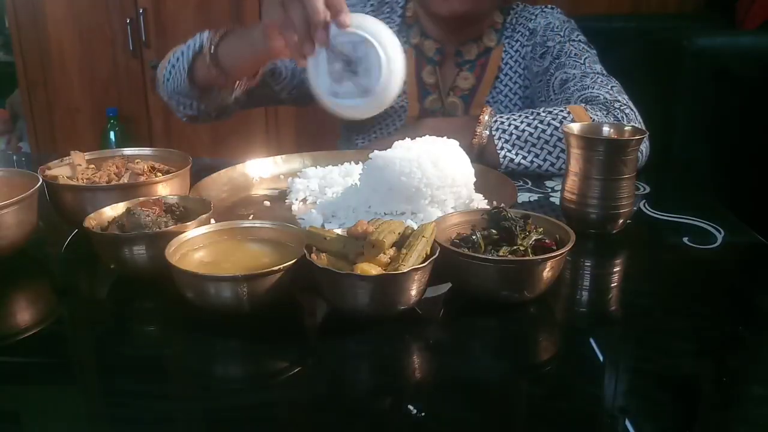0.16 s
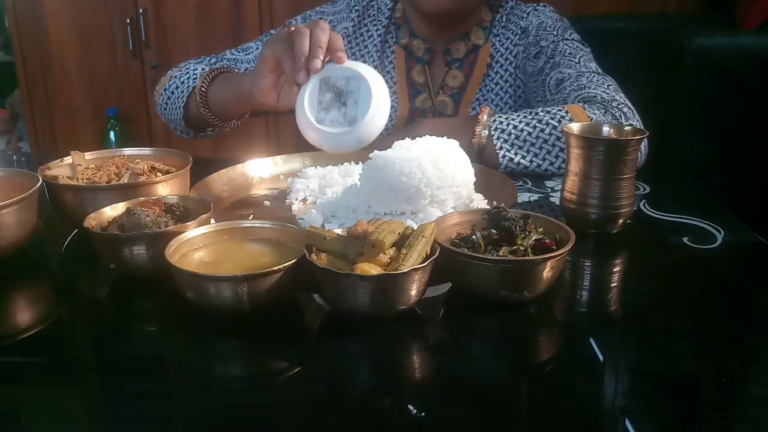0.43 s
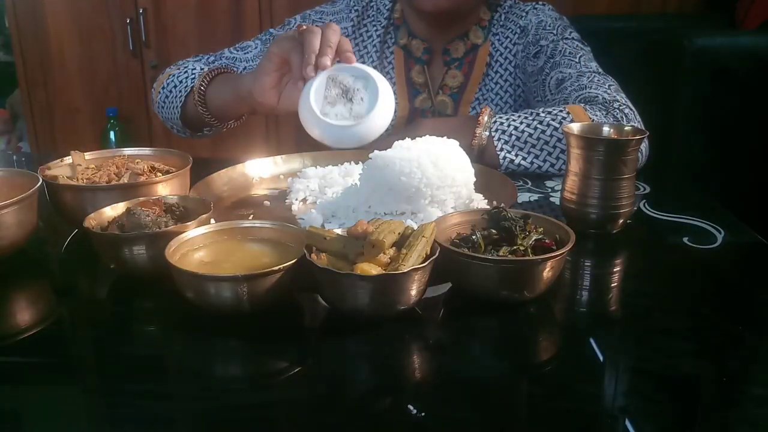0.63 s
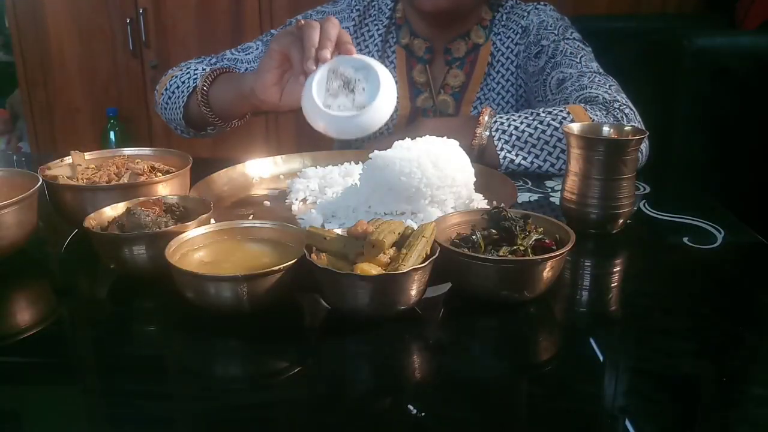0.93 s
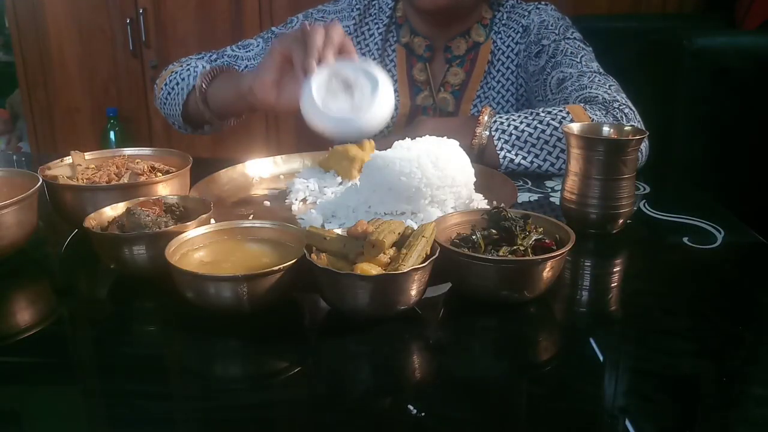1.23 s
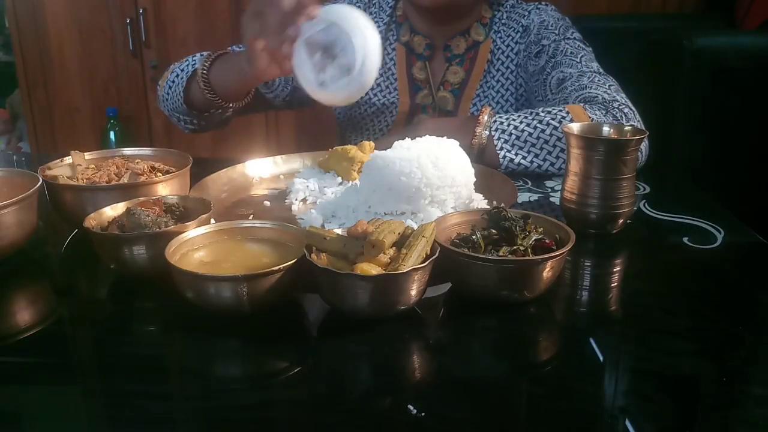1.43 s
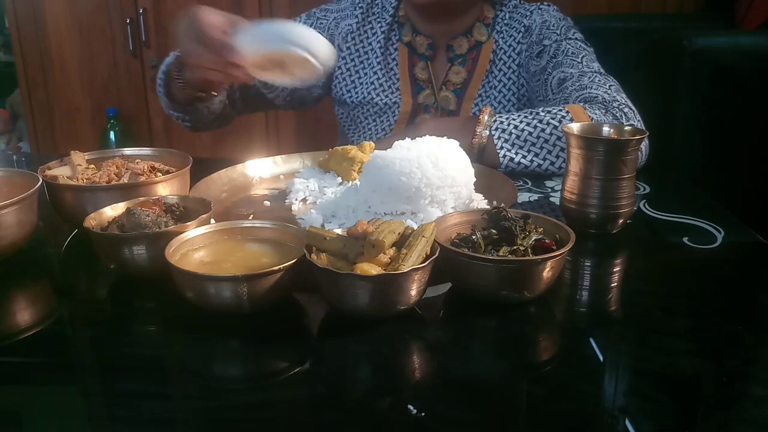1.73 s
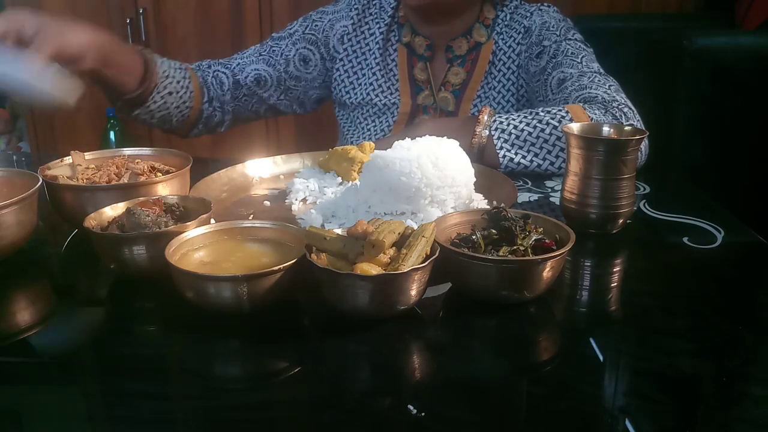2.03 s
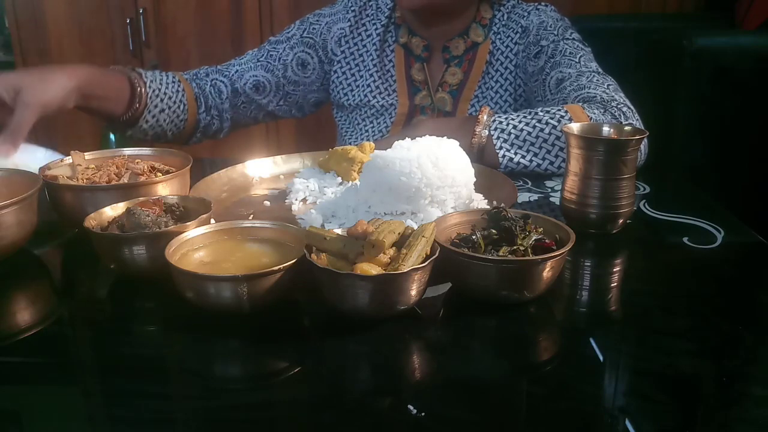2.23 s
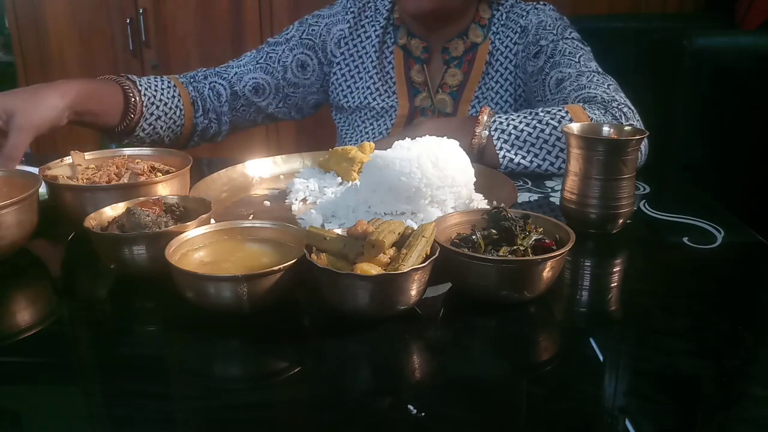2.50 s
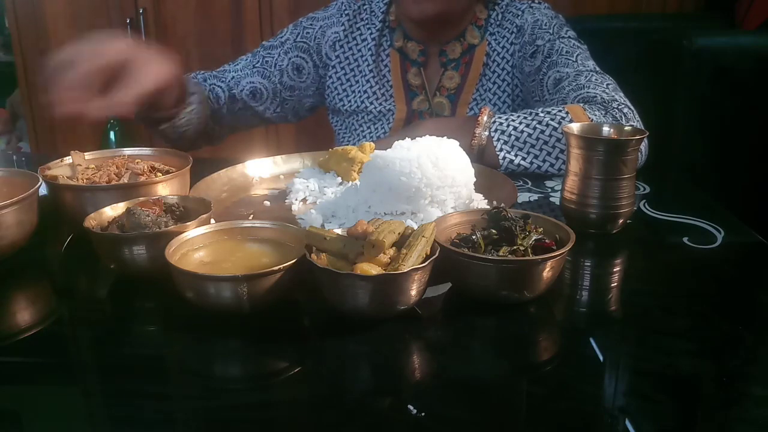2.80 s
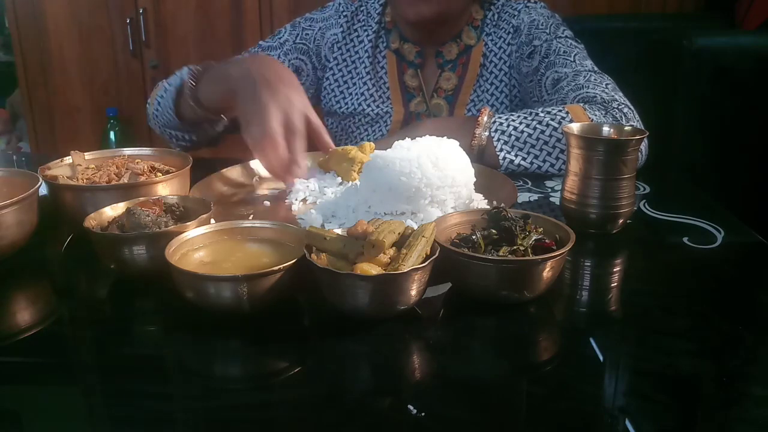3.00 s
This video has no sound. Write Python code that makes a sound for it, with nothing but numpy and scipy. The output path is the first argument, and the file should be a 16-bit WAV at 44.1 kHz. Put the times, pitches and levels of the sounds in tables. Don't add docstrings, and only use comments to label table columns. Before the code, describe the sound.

Bowl put down twice close to the microphone, a sharp clack then a louder clipped clatter, after quiet sleeve rustles and a small plate knock; faint fan hum and distant street wash indoors, dipping after the blows.

```python
import sys
import numpy as np
from scipy import signal
from scipy.fft import rfft, irfft
from scipy.io import wavfile
from scipy.ndimage import uniform_filter1d

SR = 44100
rng = np.random.default_rng(int(sys.argv[2]) if len(sys.argv) > 2 else 0)


def volts_from_decibels(level):
    exponent = np.asarray(level, float) / 20
    return 10 ** exponent


def wrap_up_sound(samples):
    columns = np.atleast_2d(samples).T
    tamed = np.clip(columns, -1, 1)
    steps = np.round(tamed * 32767).astype(np.int16)
    wavfile.write(sys.argv[1], SR, steps)


N = 138915
ROOM_DB = 4.5


def rms_one(x):
    return x / np.sqrt(np.mean(x ** 2) + 1e-20)


def at_hz(points, hz):
    table_hz, values = np.transpose(points)
    return np.interp(np.log(hz), np.log(table_hz), values)


def band_pass(x, low_hz, high_hz):
    return signal.sosfilt(signal.butter(2, [low_hz, high_hz], "band", fs=SR, output="sos"), x)


def drift(rate_hz):
    step = 40
    r = np.exp(-2 * np.pi * step * rate_hz / SR)
    slow = signal.lfilter([1], [1, -2 * r, r * r], rng.standard_normal(N // step + 2002))[2000:]
    return np.interp(np.arange(N) / step, np.arange(len(slow)), rms_one(slow))


def bands(size):
    edges = 22 * 2 ** np.arange(0, 9.7, 1 / 3)
    run_in = 8000
    white = rng.standard_normal((2, size + run_in))
    out = []
    for k, (low, high) in enumerate(zip(edges, edges[1:])):
        noise = band_pass(white[k % 2], low, high)
        out.append((np.sqrt(low * high), noise[run_in:]))
    return out


def coloured(spectrum, patchy_db, size=N, swell_db=0):
    together = drift(2.1)[:size]
    out = 0
    for hz, noise in bands(size):
        flicker = 0.6 * together + drift(7.3)[:size]
        swell = swell_db * (350 < hz < 1600)
        out = out + volts_from_decibels(at_hz(spectrum, hz) + patchy_db * flicker + swell) * noise
    return rms_one(out)


def struck(modes, hits, spread_db):
    out = np.zeros(N)
    luck = rng.normal(0, 1, (len(hits), len(modes)))
    start_s, hit_db = np.transpose(hits)[:2]
    for k, (hz, mode_db, t60_s) in enumerate(modes):
        clicks = np.full(N, 1e-18)
        clicks[(start_s * SR).astype(int)] = (-1) ** k * volts_from_decibels(hit_db + mode_db + spread_db * luck[:, k])
        r, w = volts_from_decibels(-60 / (t60_s * SR)), 2 * np.pi * hz / SR
        out += signal.lfilter([0, np.sin(w)], [1, -2 * r * np.cos(w), r * r], clicks)
    return out


def cracks(hits, spectrum):
    size = 4096
    hz = np.maximum(np.arange(size // 2 + 1) * SR / size, 1)
    folded = irfft(np.log(volts_from_decibels(at_hz(spectrum, hz))), size)
    folded[1:size // 2] *= 2
    folded[size // 2 + 1:] = 0
    click = irfft(np.exp(rfft(folded)), size)
    clicks = np.zeros(N)
    for start_s, _, crack_db in hits:
        clicks[int(start_s * SR)] = volts_from_decibels(crack_db) * rng.choice([-1, 1])
    return signal.fftconvolve(clicks, click / np.abs(click).max())[:N]


# frequency in Hz, time to fall by 60 dB in seconds.
ROOM_T60 = [(200, .2), (1000, .26), (4000, 0.26), (7000, 0.24), (12000, 0.2)]


def room(x, wet_db):
    build_s, far_db, far_t60_s, far_cut_hz = 0.0047, -41, 0.77, 5500
    t = np.arange(SR // 2) / SR
    tail = 0
    for hz, noise in bands(len(t)):
        near = volts_from_decibels(-60 * t / at_hz(ROOM_T60, hz))
        far = volts_from_decibels(far_db - 60 * t / far_t60_s) / (1 + (hz / far_cut_hz) ** 4)
        tail = tail + (near + far) * noise
    tail = tail * (1 - np.exp(-t / build_s))
    tail = tail / np.sqrt(np.sum(tail ** 2))
    return x + volts_from_decibels(wet_db) * signal.fftconvolve(x, tail)[:len(x)]


# frequency in Hz, level in dB per Hz.
AIR = [(15, -43.5), (25, -14), (128, 2.5), (173, -5), (296, -7.5), (441, -17.5), (535, -11), (731, -16),
       (1600, -25), (2080, -53), (3520, -120)]
# frequency in Hz, level in dB per Hz.
HISS = [(940, -20), (1600, -13), (2030, -4), (2630, 0.5), (2870, -1.5), (4490, -2), (4890, -5.5),
        (10000, -13.5), (15700, -9)]
# time in seconds, level in dB.
STREET = [(0.0, -58), (0.89, -56), (1.17, -54.5), (1.38, -58), (2.12, -58), (2.27, -60.5), (2.4, -60.5)]


def air():
    time_s, level_db = np.transpose(STREET)
    swell_db = np.interp(np.arange(N) / SR, time_s, level_db - level_db.mean())
    rumble = volts_from_decibels(-51) * coloured(AIR, patchy_db=-0.1, swell_db=swell_db)
    hiss = volts_from_decibels(-68.5) * coloured(HISS, patchy_db=0.5)
    return rumble + hiss


# frequency in Hz, level in dB rms.
FAN = [(113.0, -65), (543.7, -65), (732.1, -67.5), (899.0, -67), (1050, -70), (1190, -77.5), (1335, -89.5)]


def fan():
    tones = [(hz, db, 24) for hz, db in FAN]
    whine = (2860, -77, 300)
    out = 0
    for hz, db, width_hz in tones + [whine]:
        r, w = np.exp(-np.pi * width_hz / SR), 2 * np.pi * hz / SR
        noise = rng.standard_normal(N + SR)
        tone = signal.lfilter([1, 0, -1], [1, -2 * r * np.cos(w), r * r], noise)[SR:]
        out = out + volts_from_decibels(db) * rms_one(tone)
    return out


# start in seconds, level in dB, hold in seconds.
BRUSHES = [(-.05, -61.5, 0.034), (0.932, -57, 0.045), (1.931, -62, .05)]
# frequency in Hz, level in dB per Hz.
BRUSH = [(240, -31), (400, -30), (517, 2.5), (795, -15), (1520, -8), (2430, -13.5), (4280, -14),
         (8740, -36.5), (10000, -36), (13000, -74), (22000, -120)]


def brushes():
    attack_s, t60_s, edge_lead_s = 0.0066, 0.22, 0.0056
    lead = SR // 10
    t = np.arange(-lead, N) / SR
    body = edge = 0
    for start_s, db, hold_s in BRUSHES:
        rise = np.clip((t - start_s) / attack_s + 0.5, 0, 1)
        body = body + rise * volts_from_decibels(db - 60 * np.maximum(t - start_s - hold_s, 0) / t60_s)
        early_rise = np.roll(rise, -int(edge_lead_s * SR))
        edge = edge + early_rise * volts_from_decibels(db - 60 * np.maximum(t - start_s, 0) / t60_s)
    cloth = np.resize(coloured(BRUSH, patchy_db=1.0, size=SR // 2), len(t))
    thin = rms_one(band_pass(rng.standard_normal(len(t)), 5700 / 1.28, 5700 * 1.15))
    return room(body * cloth + volts_from_decibels(-3) * edge * thin, ROOM_DB)[lead:]


# start in seconds, level in dB.
TICKS = [(1.108, -52.5), (1.132, -58)]
# frequency in Hz, level in dB, time to fall by 60 dB in seconds.
BANGLE = [(3980, -6, .025), (5200, -3, .002), (9200, -1, .002), (12000, -3, .002), (15000, -1, .004)]


def bangle():
    return struck(BANGLE, TICKS, spread_db=1)


# frequency in Hz, level in dB, time to fall by 60 dB in seconds.
PLATE = [(610, -4, 0.014), (750, -2, 0.033), (870, -8.5, 0.051), (1150, -6.5, 0.029), (1380, -4, 0.025),
         (2124, -11, .007), (2840, -14, .005)]


def food_drop():
    start_s, level_db = 1.2437, -30.5
    return room(struck(PLATE, [(start_s, level_db)], spread_db=1.5), wet_db=-3)


# frequency in Hz, level in dB, time to fall by 60 dB in seconds.
BOWL = [(1310, -12, .015), (1860, -8, .014), (2160, -2, .02), (2750, -5, .009), (3300, -5, .007),
        (3910, -2, .03), (4050, -7, .014), (6090, -12, .025), (6520, -19, .018), (7760, -21, .022),
        (8350, -29, .014), (9200, -23, .016), (11800, -37, .015), (13000, -35, .015)]
# start in seconds, ring in dB, crack in dB.
TOUCH = [
    (2.4366, -11.5, -5),
    (2.445, -23, -13.5),
    (2.456, -20.5, -14.5),
]
# frequency in Hz, level in dB per Hz.
TOUCH_CRACK = [(200, -18.5), (400, -9), (1300, -3), (3400, 1), (4600, -11.5), (9000, -21), (10200, -34.5),
               (15700, -40.5)]


def light_touch():
    touch = struck(BOWL, TOUCH, spread_db=1.5) + cracks(TOUCH, TOUCH_CRACK)
    return signal.sosfilt(signal.butter(2, 250, "high", fs=SR, output="sos"), touch)


# frequency in Hz, level in dB, time to fall by 60 dB in seconds.
STACK = [(605, -15.5, 0.02), (860, -18.5, .03), (1219, -8.5, 0.017), (2260, -2.5, 0.0077),
         (2810, -2.5, 0.015), (3130, -4.5, 0.0087), (3750, 3.5, 0.005), (4077, 0, .016), (5750, -4, 0.012),
         (6244, -4, .015), (7580, -16.5, 0.026), (9080, -12.5, 0.016), (11620, -19.5, .015),
         (13000, -21, .015)]
# start in seconds, ring in dB, crack in dB.
LANDING = [(2.672, -8.5, 7), (2.6732, -10, 9.5), (2.6752, -8.5, 10), (2.682, -10, 4), (2.688, -7.5, 5.5),
           (2.692, -9, 5), (2.696, -11.5, 4), (2.701, -11, 2.5), (2.707, -11.5, 0), (2.712, -16, 0),
           (2.718, -16, 1), (2.722, -18.5, -6), (2.738, -33, -7)]
# frequency in Hz, level in dB per Hz.
LANDING_CRACK = [(60, -46.5), (300, -19.5), (1300, -8), (4100, -1.5), (6300, -7.5), (6900, -14.5),
                 (10000, -20.5), (15700, -34.5)]


def hard_landing():
    return struck(STACK, LANDING, spread_db=2.5) + cracks(LANDING, LANDING_CRACK)


def scene():
    background = air() + fan()
    blows = room(bangle() + light_touch() + hard_landing(), ROOM_DB)
    return (background + brushes() + food_drop() + blows)[None]


def roll_off(x):
    return signal.sosfilt(signal.butter(12, 15850, fs=SR, output="sos"), x)


def record(dry):
    duck_from_db, duck_share, recover_db_per_s, attack_s = -21.5, 0.25, 4.5, 0.03
    climb = recover_db_per_s * np.arange(N) / SR
    level_db = 10 * np.log10(uniform_filter1d(dry[0] ** 2, size=256) + 1e-12)
    wanted_db = duck_share * np.maximum(level_db - duck_from_db, 0)
    duck_db = np.maximum.accumulate(wanted_db + climb) - climb
    r = np.exp(-1 / (attack_s * SR))
    ducked = dry * volts_from_decibels(-signal.lfilter([1 - r], [1, -r], duck_db))
    clipped = np.clip(ducked, -1, 1)
    mix = signal.sosfilt(signal.ellip(10, 0.3, 50, 15720, fs=SR, output="sos"), clipped)
    return roll_off(mix)


dry = scene()
out = record(dry)
wrap_up_sound(out)
```